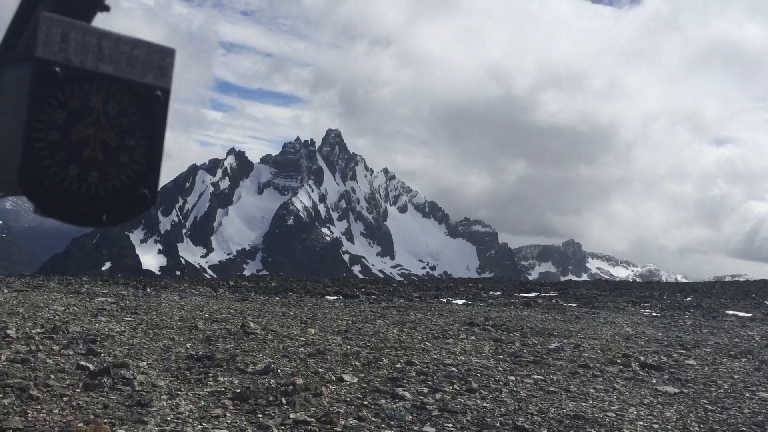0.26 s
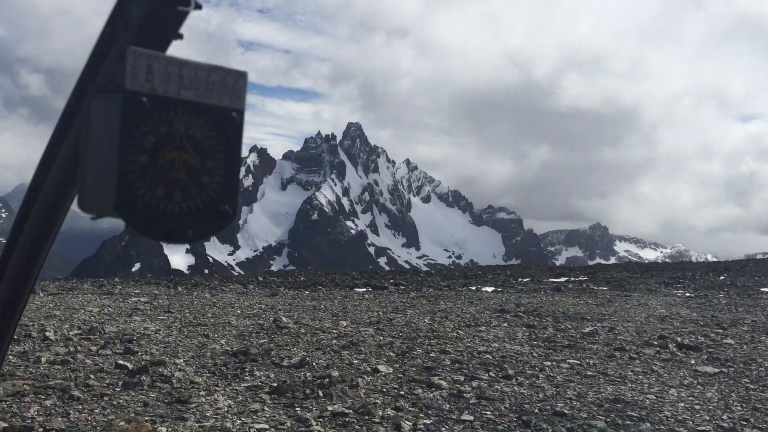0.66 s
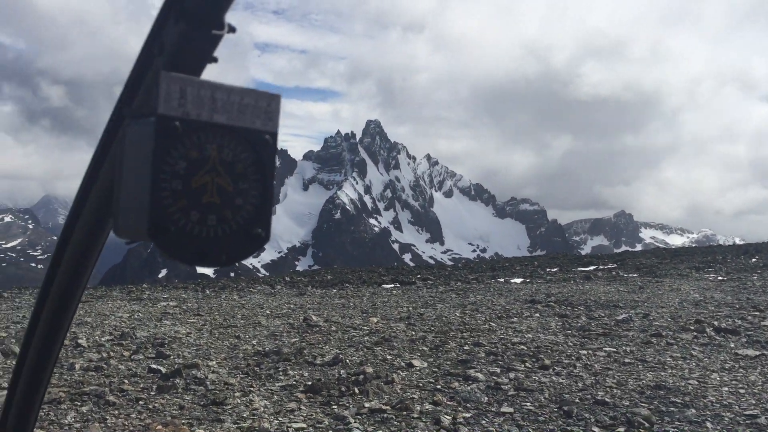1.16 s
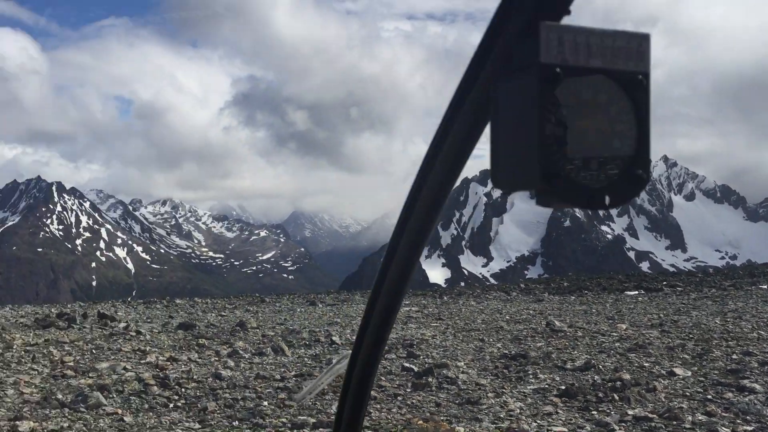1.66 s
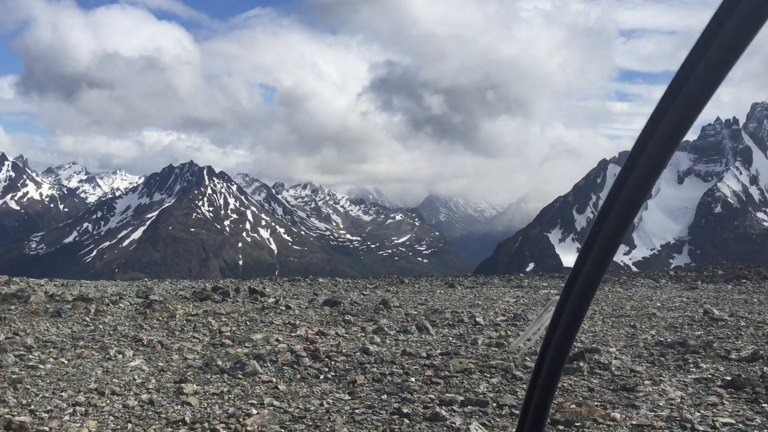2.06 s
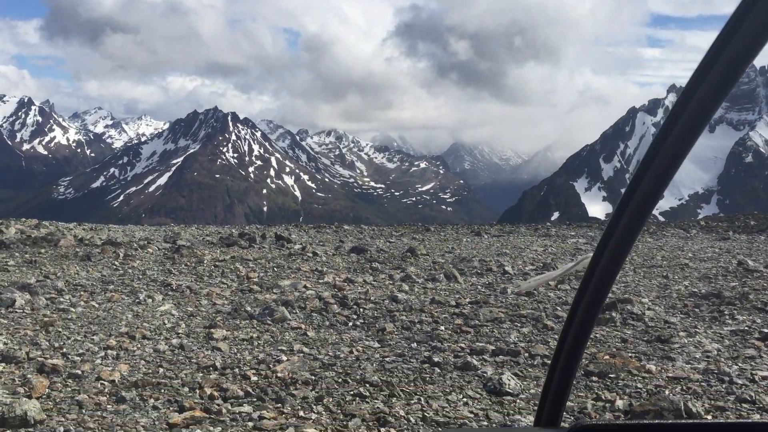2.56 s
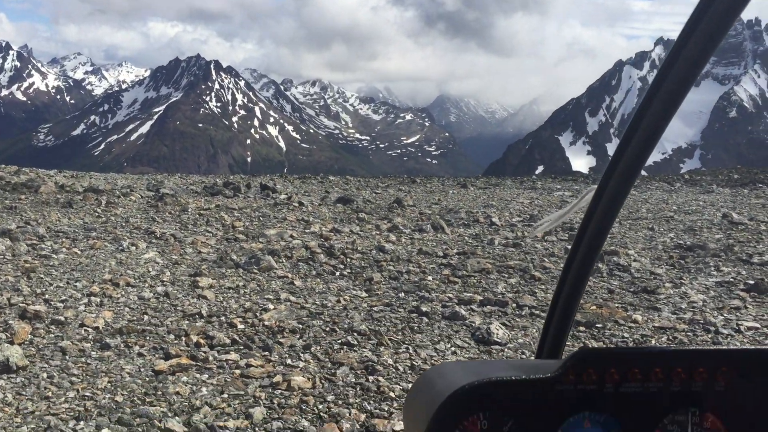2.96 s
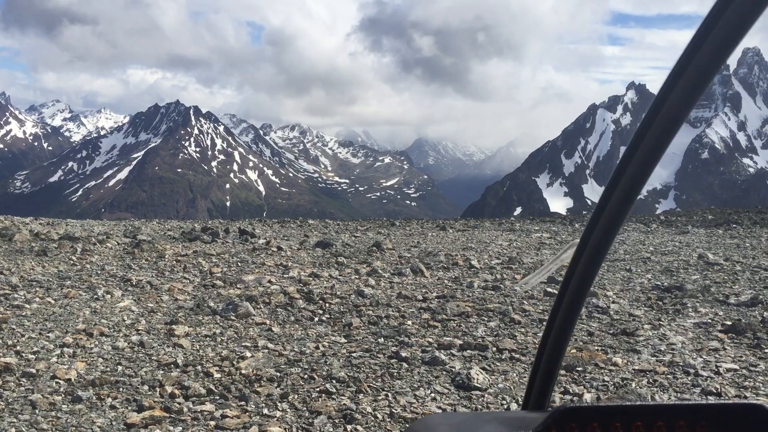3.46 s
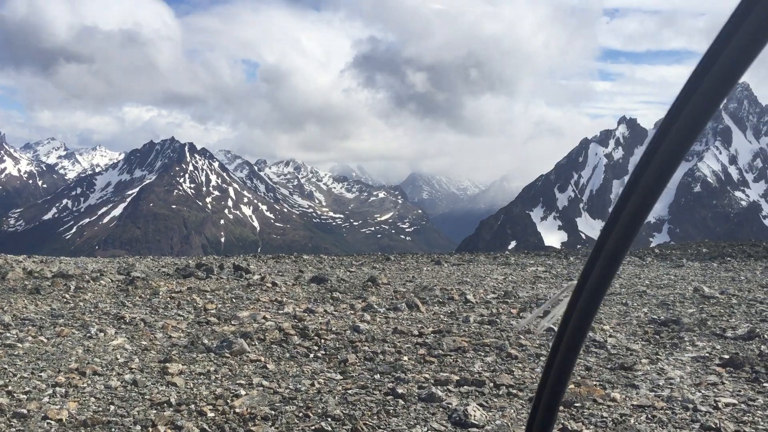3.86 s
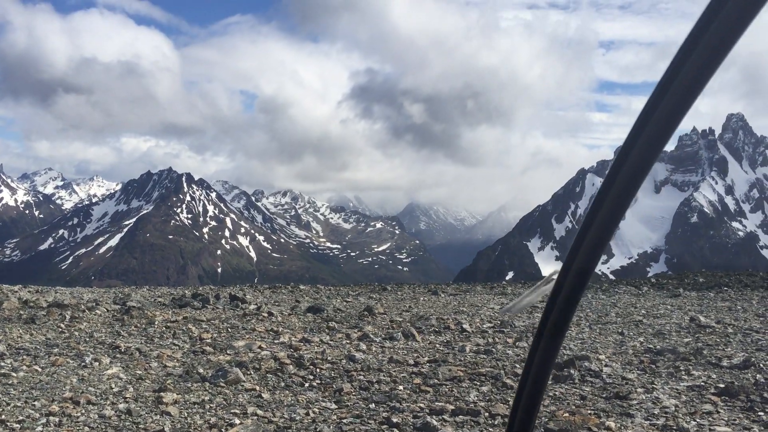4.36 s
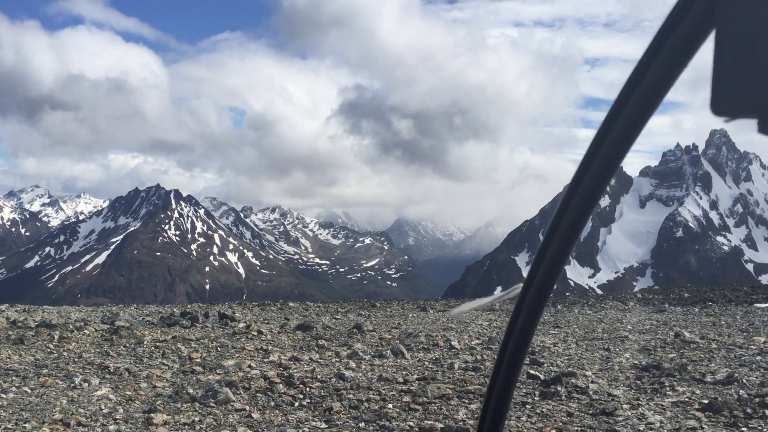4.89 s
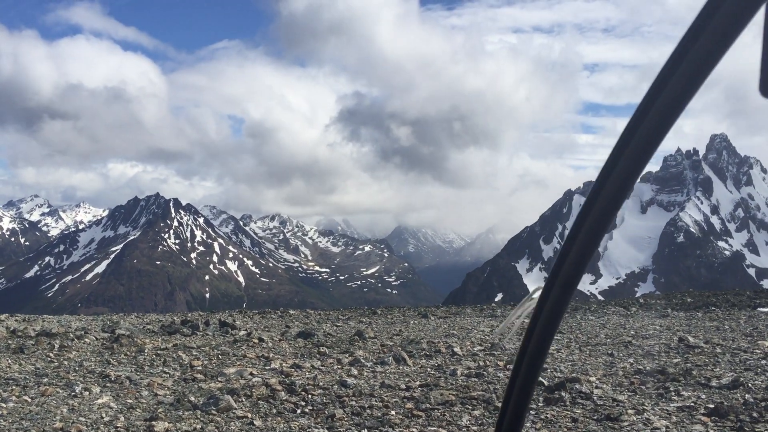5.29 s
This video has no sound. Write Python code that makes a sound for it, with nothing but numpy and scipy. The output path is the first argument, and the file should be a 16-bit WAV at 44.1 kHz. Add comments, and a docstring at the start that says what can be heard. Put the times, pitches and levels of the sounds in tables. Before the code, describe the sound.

Inside an idling helicopter, the piston engine drones steadily while the rotor blades whoosh and slap in a fast beat.

```python
"""In the cockpit of a piston helicopter that idles on stony ground.
The six-cylinder engine drones as it fires, and the fan and gears that it turns whine above it.
Each of the two main blades whooshes past with a slap and a whistling tip, and the air they push down
rumbles round the cabin. Rubs, rustles and two small ticks sound close by."""
import sys
import numpy as np
from scipy import signal
from scipy.fft import rfft, irfft, next_fast_len
from scipy.io import wavfile
from scipy.ndimage import map_coordinates

SR = 44100
rng = np.random.default_rng(int(sys.argv[2]) if len(sys.argv) > 2 else 0)


def master(y):
    """Save y as 16-bit WAV."""
    cut = np.clip(np.atleast_2d(y).T, -1, 1)
    pcm = np.round(cut * 32767)  # scale
    wavfile.write(sys.argv[1], SR, pcm.astype(np.int16))


N = 243961
TIME = np.arange(N) / SR

# short rustles: start_s, level_db, crisp_part_db (added to level_db)
RUSTLES = [(0.238, -35, -17), (0.292, -41, -10), (0.335, -41, -12), (0.589, -47, -4), (1.718, -51, 2),
           (1.861, -40.5, -10), (2.317, -41, -10), (2.376, -39, -16), (2.544, -41, -8), (2.620, -36.5, -15),
           (2.672, -35, -14), (2.693, -37.5, -8.5), (2.722, -45, -14), (2.764, -36.5, -9),
           (2.798, -40, -15), (2.867, -41, -9), (2.892, -40, -10), (2.941, -38.5, -13), (2.991, -40, -6.5),
           (3.104, -40.5, -12), (3.135, -39, -13), (3.256, -36, -12), (3.309, -44, -7), (3.385, -44, -8),
           (3.651, -39, -12), (3.856, -43, -15), (4.699, -40, -8)]
# longer rubs: start_s, length_s, level_db
RUBS = [(.22, .2, -57), (2.52, 0.46, -52), (2.83, 0.09, -49), (3.07, 0.13, -49), (3.25, 0.082, -45)]
# A colour says how strong a noise is at each pitch, from low to high.
# colours of a rustle's dull part, its crisp part and a rub: pitch_hz, level_db
DULL_COLOUR = [(900, -3), (2000, 18.5), (3200, 5.5), (4500, -5)]
CRISP_COLOUR = [(3000, 5), (4200, 2), (6500, 0.5), (8500, -5), (11000, -21), (15700, -16)]
RUB_COLOUR = [(1400, 18), (2200, -8), (4000, 0), (6500, -9), (8500, -10), (11000, -11), (15700, -16)]
# colour of the click: pitch_hz, level_db
CLICK_COLOUR = [(1500, -12), (3800, 8.5), (6500, -5), (8700, 2), (11500, -13), (15700, -11)]
# ringing notes of a small metal part: pitch_hz, level_db, fade_s
CLINK_NOTES = [(8600, -14, .08), (10850, -11, .11), (11660, -15, .1), (13220, -3, .1), (14350, -6, .07)]

# strength of the wash (the air the blades push down) and of the cabin's boom: time_s, wash_db, boom_db
WASH = [(0, -3.5, -25), (1.28, -5, -24), (1.45, -4, -25), (1.85, 5, -21.5), (2.35, -2.5, -22),
        (2.7, -4, -19.5), (3.2, -0.5, -22), (3.75, -3.5, -22), (4.6, 0.5, -20.5), (5.0, -2.5, -25),
        (5.53, -2.5, -25.5)]
# gusts that hit the cabin, and a spell of churning air: start_s, length_s, level_db
GUSTS = [(1.7, 0.47, -35), (3.8, 0.68, -24), (5.03, 0.41, -28.5)]
CHURNS = [(2.05, 1.04, -29)]
# colours of the air in and around the cabin, deepest first: pitch_hz, level_db
HOLLOW_COLOUR = [(44, -45), (51, 15), (55.5, 19), (60, -28), (68, -33)]
RUMBLE_COLOUR = [(36, 9), (44, 7), (60, 14.5), (75, 4), (95, 4), (125, 10), (160, 2.5)]
BOOM_COLOUR = [(60, -31), (100, -6.5), (130, 3), (155, 5), (195, -2.5), (230, -4.5), (300, -8.5),
               (400, -8.5), (520, -27), (900, -73)]
CHURN_COLOUR = [(190, -1), (230, -3), (270, -8)]
RUSH_COLOUR = [(200, -20), (420, 3), (620, 4), (950, 3), (1300, 5), (1600, 0), (2100, -2), (2700, -7.5),
               (3600, -10.5), (4300, -13.5), (4900, -19), (6000, -18), (6800, -20.5), (7600, -28.5)]
HISS_COLOUR = [(3000, -8), (5000, 1), (6500, 5.5), (7600, -2), (9300, 3), (10300, 1), (11400, 3.5),
               (13000, -3), (15700, -2)]

# whine of the gears and other engine-driven parts, at average speed: pitch_hz, level_db
GEAR_NOTES = [(998.2, -50.5), (1020.5, -53), (1043.5, -54), (1133.5, -52), (5076, -87)]
# whine of the main gear's teeth: time_s, level_db
MAIN_GEAR_LEVEL = [(0, -47), (0.5, -49), (0.8, -44), (1.45, -47), (1.85, -42.5), (2.35, -39.5),
                   (2.9, -43.5), (3.8, -43), (4.6, -46), (5.53, -49)]
# the cooling fan's three lowest notes: time_s, first_db, second_db, third_db
FAN_LEVELS = [(0, -43, -40, -44), (.5, -35.5, -51, -49.5), (.9, -33.5, -44.5, -44.5),
              (1.6, -33.5, -48.5, -47.5), (2.1, -38, -41, -46), (2.9, -41.5, -45.5, -53),
              (3.5, -37, -41, -53), (4.2, -40, -40, -57), (5.53, -45, -49.5, -59)]
# the fan's higher notes, and the tail rotor's notes: multiple_of_blade_rate, level_db
FAN_HIGH_NOTES = [(4, -57.5), (5, -55.5), (6, -61.5), (9, -66)]
TAIL_NOTES = [(1, -32), (2, -33.5), (3, -43)]

# whistle of the blade tips (a pass is one blade going by): time_s, level_db, fade_db_per_pass
TIP_WHISTLE = [(0, -59, -2), (0.8, -61, 0), (1.5, -68, -3), (2.4, -63, 4), (3.6, -56.5, 10), (3.9, -52, 10),
               (4.4, -50, 7), (4.75, -54.5, 8), (5.15, -53.5, 9), (5.35, -51, 14), (5.53, -48, 19)]
# colours of the whistle's low and high parts, and what the cabin lets in: pitch_hz, level_db
TIP_LOW_COLOUR = [(4200, -11), (5100, -4.5), (5900, -3.5), (6500, -5.5), (7100, -24)]
TIP_HIGH_COLOUR = [(7600, -20), (9400, -10), (10400, -8), (11500, -7), (12800, -9), (14500, -12)]
CABIN_FILTER = [(4400, -3), (5500, -1), (6400, 4), (6950, 1), (7500, -5), (9300, -2), (10300, -5),
                (11400, -0.5), (12400, -4), (13500, -7), (15500, -12)]
# slaps that are harder than the rest: start_s, level_db, pitch_hz
HARD_SLAPS = [(0.24, -26, 510), (0.548, -20.5, 450), (1.342, -23, 610), (1.432, -18, 520),
              (1.563, -19, 450), (1.641, -23, 480), (1.786, -20, 540), (2.003, -20, 540),
              (2.094, -21.5, 600), (2.89, -20.5, 430), (3.031, -19, 620), (3.183, -16.5, 600),
              (3.261, -21.5, 590), (3.482, -24, 640), (3.925, -22, 620), (4.152, -20.5, 480),
              (4.292, -21, 600), (4.51, -21.5, 600), (4.585, -22, 520), (4.81, -17.5, 500),
              (5.099, -21, 480)]
# colour of an ordinary slap: pitch_hz, level_db
SLAP_COLOUR = [(340, -13), (430, 6.0), (650, 2.0), (850, -24.0), (1300, -5.0)]
# how strongly the whoosh pulses, and its bright edge: time_s, swing_db, edge_db
WHOOSH = [(0, 5.5, -42), (0.8, 1, -52), (1.3, 2.8, -41), (1.55, 5, -49), (2.05, 4.5, -43), (2.3, 2, -38.5),
          (2.85, 1, -40), (3.15, 4, -37), (3.7, 1.5, -39), (4.4, 5.5, -37.5), (4.75, 4.5, -38),
          (5.0, 4.5, -53), (5.53, 2.5, -41)]
# colours of the whoosh and its edge: pitch_hz, level_db
WHOOSH_COLOUR = [(220, -28), (340, 0), (430, 0), (530, 0), (650, 1), (760, -6), (950, -7), (1150, -16),
                 (1500, -16), (2200, -37.5)]
EDGE_COLOUR = [(650, -1), (800, -5), (950, 0), (1060, -3.5), (1250, -18)]

# engine speed (all six cylinders fire once in a cycle): time_s, cycles_per_s
ENGINE_SPEED = [(0, 22.645), (1, 22.68), (2.6, 22.68), (3.2, 22.725), (3.8, 22.645), (4.3, 22.645),
                (4.9, 22.73), (5.53, 22.66)]
# the firing note, and the note an octave above it: time_s, level_db
FIRING_LEVEL = [(0, -17), (.7, -20.5), (1.3, -18.5), (1.9, -23.5), (2.15, -23), (2.5, -21.5), (3.03, -24.5),
                (3.4, -20), (3.9, -28.5), (4.3, -24.5), (4.55, -20.5), (4.87, -15), (5.08, -22.5),
                (5.28, -15.5), (5.53, -22)]
OCTAVE_LEVEL = [(0, -31.5), (1.1, -30.5), (1.9, -40.5), (3.6, -33), (5.53, -37.5)]
# the other exhaust notes: multiple_of_cycle_rate, level_db
EXHAUST_NOTES = [(3, -31), (4, -34), (5, -34), (7, -35.5), (8, -32.5), (9, -31.5), (10, -44), (11, -42.5),
                 (13, -38.5), (14, -35.5), (15, -43), (16, -44.5)]


def gain_of(db):
    """Turns decibels into a number to multiply a sound by."""
    return 10 ** (np.asarray(db) / 20)


def evened(x):
    """Scales a signal to an average power of 1."""
    return x / np.sqrt(np.mean(x ** 2) + 1e-20)


def curves(rows):
    """Joins the rows of a timed table with straight lines, giving one curve for each value column."""
    times, *columns = np.transpose(rows)
    return [np.interp(TIME, times, column) for column in columns]


def coloured(x, colour):
    """Gives a sound a colour; beyond the table's ends it falls by 24 dB an octave."""
    pitches, db = np.transpose(colour)
    size = next_fast_len(N)
    hz = np.fft.rfftfreq(size, 1 / SR) + 1
    roll_off = np.minimum(np.minimum(hz / pitches[0], pitches[-1] / hz), 1) ** 4
    shape = gain_of(np.interp(np.log(hz), np.log(pitches), db)) * roll_off
    return irfft(rfft(x, size) * shape, size)[:N]


def noise(colour):
    """Steady noise of the given colour."""
    return evened(coloured(rng.standard_normal(N), colour))


def drift(rate_hz):
    """A smooth random wobble, no faster than about rate_hz."""
    size = 4096
    hz = np.fft.rfftfreq(size, TIME[-1] / size)
    slow = irfft(rfft(rng.standard_normal(size)) / (1 + (hz / rate_hz) ** 4))
    return evened(np.interp(TIME, np.linspace(0, TIME[-1], size), slow - slow.mean()))


def tone(turns, waver, waver_hz):
    """A note, one wave for each turn, that wavers in the moving air."""
    angle = 2 * np.pi * (turns + rng.random())
    return evened((1 + waver * drift(waver_hz)) * np.cos(angle) + waver * drift(waver_hz) * np.sin(angle))


def harmonics(turns, notes, waver, waver_hz):
    """The notes of one spinning part, at whole multiples of its rate."""
    return sum(gain_of(db) * tone(round(k) * turns, waver, waver_hz) for k, db in notes)


def throb(blade, lead, swing_db):
    """Swells once a blade, lead passes early, keeping the average power the same."""
    swell = gain_of(swing_db * np.cos(2 * np.pi * (blade + lead)))
    return swell / np.sqrt(np.i0(swing_db * np.log(10) / 10))


def swells(rows):
    """A smooth rise and fall for each row of start_s, length_s, level_db."""
    return sum(gain_of(db) * np.sin(np.pi * np.clip((TIME - s) / length, 0, 1)) for s, length, db in rows)


def hit_shape(age_s, rise_s, fade_s):
    """The loudness of a small hit: it rises quickly and dies away by 60 dB in fade_s."""
    return (1 - np.exp(-age_s / rise_s)) * np.exp(-np.log(1000) * age_s / fade_s)


def hit(start_s, rise_s, fade_s):
    """Places one hit shape at start_s."""
    loudness = np.zeros(N)
    ringing = (TIME > start_s) & (TIME < start_s + 2 * fade_s)
    loudness[ringing] = hit_shape(TIME[ringing] - start_s, rise_s, fade_s)
    return loudness


def rustles():
    """Something rubs close by with a grainy scrape, and rustles briefly where it catches."""
    catches = [gain_of(db) * hit(s - .001, rise_s=.00086, fade_s=.15) for s, db, _ in RUSTLES]
    crisp_catches = [catch * gain_of(db) for catch, (_, _, db) in zip(catches, RUSTLES)]
    dull = np.linalg.norm(catches, axis=0) * noise(DULL_COLOUR)
    crisp = np.linalg.norm(crisp_catches, axis=0) * noise(CRISP_COLOUR)
    grain = gain_of(7.5 * np.tanh(drift(500)))
    rubs = swells(RUBS) * gain_of(2.1 * drift(40)) * noise(RUB_COLOUR)
    return grain * (dull + crisp + rubs)


def ticks():
    """A dry click, and later the faint clink of a small metal part."""
    click = hit(start_s=.387, rise_s=.0024, fade_s=.081) * noise(CLICK_COLOUR)
    clink = sum(gain_of(db) * hit(start_s=3.279, rise_s=.005, fade_s=fade) * np.sin(2 * np.pi * hz * TIME)
                for hz, db, fade in CLINK_NOTES)
    return gain_of(-35) * click + gain_of(-40) * clink


def cabin_echoes(air):
    """Nearby glass and panels bounce the treble back within 5 milliseconds, changing its colour."""
    count = 14
    echoes = np.zeros(round(.005 * SR))
    echoes[rng.integers(len(echoes) // 10, len(echoes), count)] = .07 * rng.choice([-1, 1], count)
    treble = signal.sosfilt(signal.butter(2, 1400, "high", fs=SR, output="sos"), air)
    return air + signal.oaconvolve(treble, echoes)[:N]


def downwash(blade):
    """Gusty air from the blades shakes the cabin and rushes over its skin, pulsing as they pass."""
    _, boom_db = curves(WASH)
    swirl_db = drift(21) + 1.2 * drift(98)
    gusts = swells(GUSTS)
    rumble_level = np.hypot(gain_of(-29), gain_of(.5) * gusts)
    rumble = rumble_level * noise(RUMBLE_COLOUR) * throb(blade, lead=.15, swing_db=-.5)
    hollow = (gain_of(-32) + gusts) * noise(HOLLOW_COLOUR)  # the lowest note of the air in the cabin
    boom = gain_of(boom_db + .3) * noise(BOOM_COLOUR) * throb(blade, lead=.015, swing_db=2)
    rush_db = -37 - .33 * TIME + swirl_db  # slowly eases off
    rush = gain_of(rush_db) * noise(RUSH_COLOUR) * throb(blade, lead=.094, swing_db=.77)
    hiss = gain_of(-58.5 + .67 * swirl_db) * noise(HISS_COLOUR) * throb(blade, lead=.075, swing_db=.5)
    churn = swells(CHURNS) * noise(CHURN_COLOUR)
    return rumble + hollow + boom + churn + rush + hiss


def gears(cycle):
    """Gear teeth meet so fast that they whine, at pitches that follow the engine's speed."""
    main_db, = curves(MAIN_GEAR_LEVEL)
    main_hz = 1090.7
    clock_s = cycle / cycle[-1] * TIME[-1]  # runs faster when the engine does
    whine = sum(gain_of(db) * tone(hz * clock_s, waver=.85, waver_hz=6.2) for hz, db in GEAR_NOTES)
    return whine + gain_of(main_db) * tone(main_hz * clock_s, waver=.4, waver_hz=22)


def tail_rotor(cycle):
    """The tail blades beat the air a few times each engine cycle, making a low hum."""
    return harmonics(3.565 * cycle, TAIL_NOTES, waver=.24, waver_hz=1.2)


def cooling_fan(cycle):
    """The fan's blades pass many times each engine cycle, making a whine."""
    passes = 17.06 * cycle
    low = sum(gain_of(db) * tone(k * passes, waver=.2 * k ** 1.3, waver_hz=4.8 * k)
              for k, db in enumerate(curves(FAN_LEVELS), 1))
    return low + harmonics(passes, FAN_HIGH_NOTES, waver=1, waver_hz=13)


def doppler(x, past, fall):
    """Pitch slides down unevenly as a blade tip swings past; a bigger fall slides further."""
    speed = np.exp(-fall * past + .027 * drift(39.2))
    return map_coordinates(x, [np.cumsum(speed)], order=3, mode="mirror")


def blade_tips(blade):
    """Air puffs off each tip in a hoarse whistle whose low and high parts both sink in pitch."""
    level_db, fade_db = curves(TIP_WHISTLE)
    lead = .09
    past = (blade + lead + .5) % 1 - .5  # below zero as the tip comes, above as it goes
    swell = np.abs(np.cos(np.pi * past)) ** .9 * gain_of(-fade_db * past)
    swell *= gain_of(1.1 * drift(11))  # no two passes are equally strong
    low = doppler(noise(TIP_LOW_COLOUR), past, fall=.42) * gain_of(-11 * past - 3.5 + 1.8 * drift(48))
    high = doppler(noise(TIP_HIGH_COLOUR), past, fall=.7) * gain_of(.65 * drift(20))
    return gain_of(level_db) * swell * coloured(low + high, CABIN_FILTER)


def blade_slaps(blade):
    """Each blade slaps the air stirred by the last; now and then one cuts hard into a tight swirl."""
    wash_db, _ = curves(WASH)
    lead = .15  # passes ahead of the whoosh
    pass_number, fraction = np.divmod(blade + lead + 1, 1)
    scatter_db = rng.standard_normal(N)[pass_number.astype(int)]
    age_s = fraction / (np.gradient(blade) * SR)
    soft = gain_of(-25 + wash_db + scatter_db) * hit_shape(age_s, rise_s=.0082, fade_s=.1)
    starts, _, pitches = np.transpose(HARD_SLAPS)
    hz = pitches[np.searchsorted(starts, TIME) - 1]
    hz *= 1 + .35 * np.tanh(drift(326))  # rough air smears the pitch
    hard = sum(gain_of(db) * hit(s, rise_s=.003, fade_s=.16) for s, db, _ in HARD_SLAPS)
    return hard * np.sin(2 * np.pi * np.cumsum(hz) / SR) + soft * noise(SLAP_COLOUR)


def blade_whoosh(blade):
    """Each main blade drags a burst of rough air overhead; churned air blurs the beats together."""
    wash_db, _ = curves(WASH)
    swing_db, edge_db = curves(WHOOSH)
    angle = 2 * np.pi * (blade - .01)
    # air ahead of and behind the blade holds the burst open for half a pass
    chop = gain_of(swing_db * (np.cos(angle) - .25 * np.cos(2 * angle) - 1))
    edge = gain_of(edge_db) * throb(blade, lead=.04, swing_db=3.5) * noise(EDGE_COLOUR)
    level_db = -28.5 + .65 * wash_db + 1.2 * drift(28)
    return gain_of(level_db) * chop * noise(WHOOSH_COLOUR) + edge


def engine(cycle):
    """Six firings a cycle make a drone, shaken by the wash; unequal cylinders add the other notes."""
    firing_db, = curves(FIRING_LEVEL)
    octave_db, = curves(OCTAVE_LEVEL)
    _, boom_db = curves(WASH)
    shake = .09 * gain_of(2.5 * (boom_db + 25))
    firing = gain_of(firing_db) * tone(6 * cycle, waver=shake, waver_hz=5.9)
    octave = gain_of(octave_db) * tone(12 * cycle, waver=.13, waver_hz=13)
    return firing + octave + harmonics(cycle, EXHAUST_NOTES, waver=.26, waver_hz=1.7)


def scene():
    """Mixes all the sounds into one channel; the engine's speed sets the pace of every spinning part."""
    cycle = np.cumsum(curves(ENGINE_SPEED)[0]) / SR  # engine cycles so far
    blade = .5986 * cycle - .39  # main blade passes so far
    air = blade_whoosh(blade) + blade_slaps(blade) + downwash(blade) + blade_tips(blade) + rustles()
    machinery = engine(cycle) + gears(cycle) + tail_rotor(cycle) + cooling_fan(cycle)
    return (machinery + cabin_echoes(air) + ticks())[None]


def record(dry):
    """Cuts away the very highest treble."""
    cutoff_hz = 15730
    low_pass = signal.firwin(1023, cutoff_hz, window=("kaiser", 9), fs=SR)
    return signal.oaconvolve(dry, low_pass[None], "same")


dry = scene()
out = record(dry)
master(out)
```